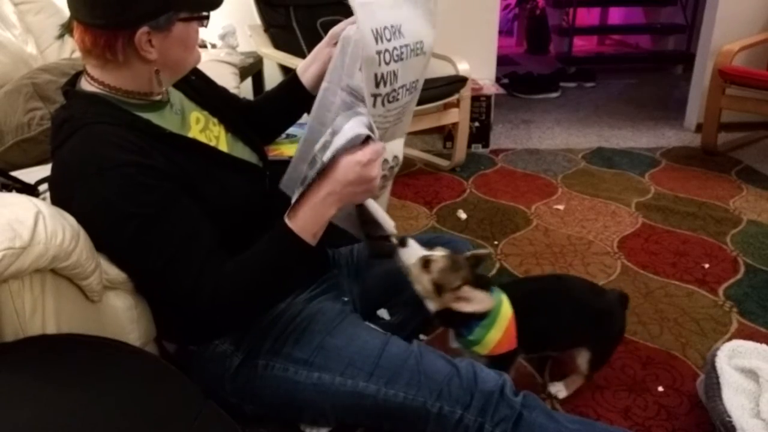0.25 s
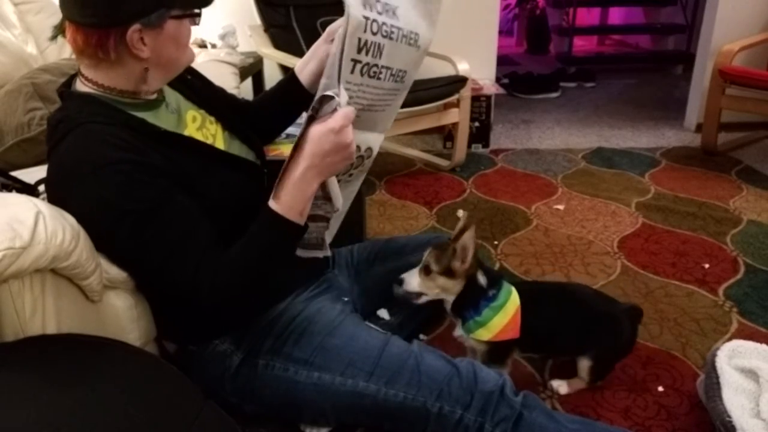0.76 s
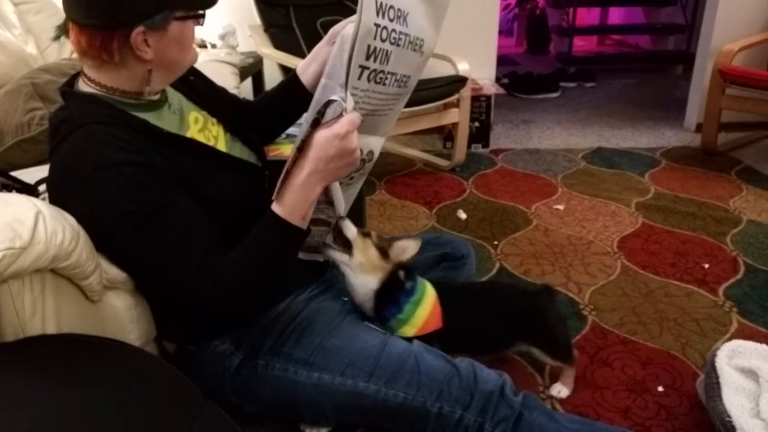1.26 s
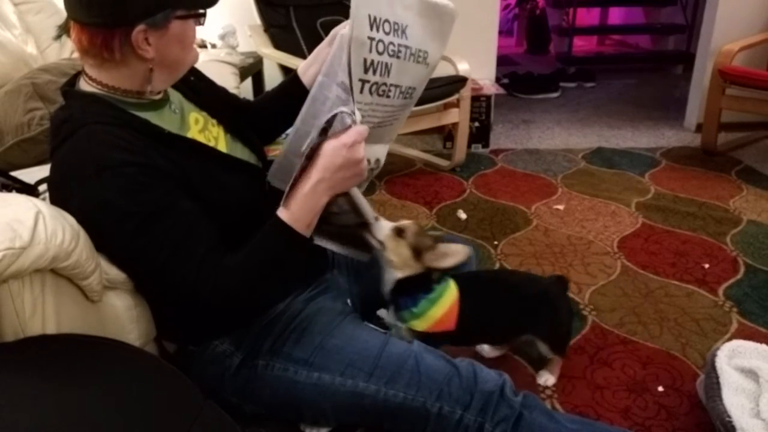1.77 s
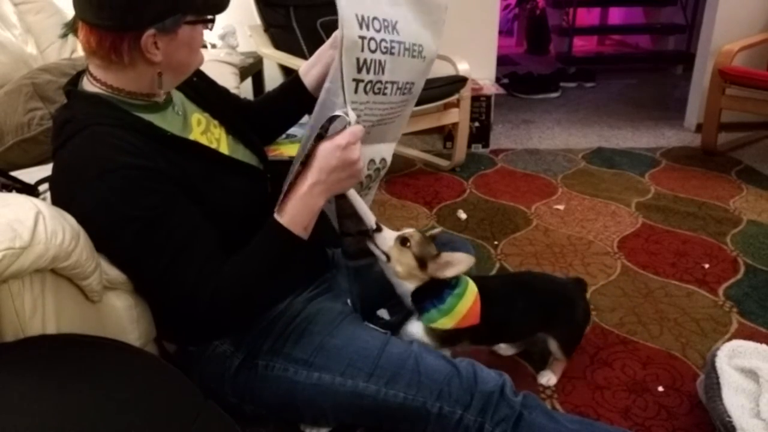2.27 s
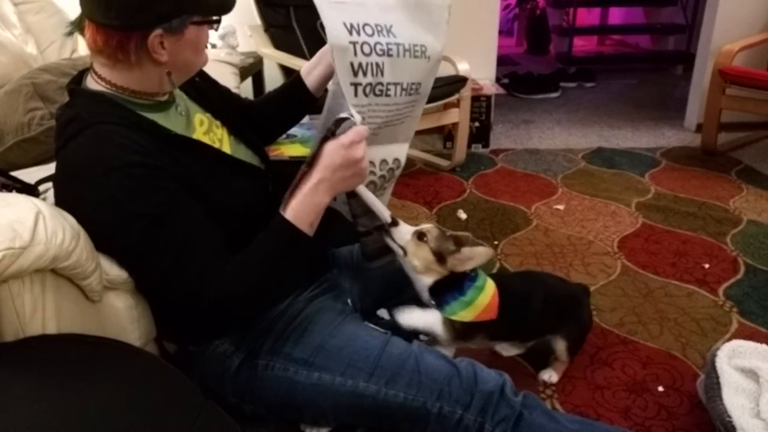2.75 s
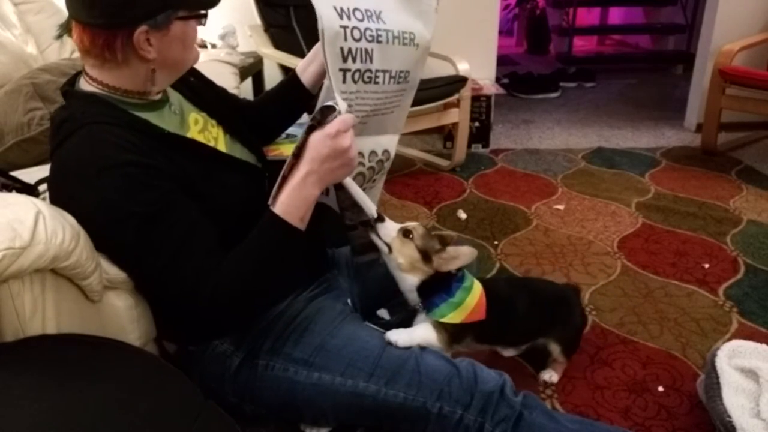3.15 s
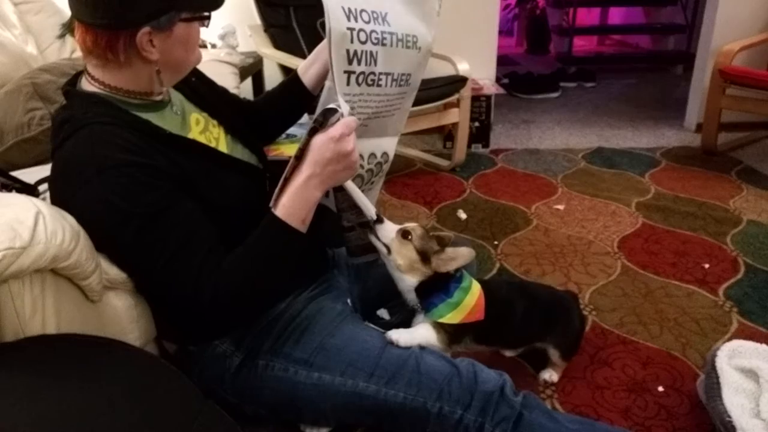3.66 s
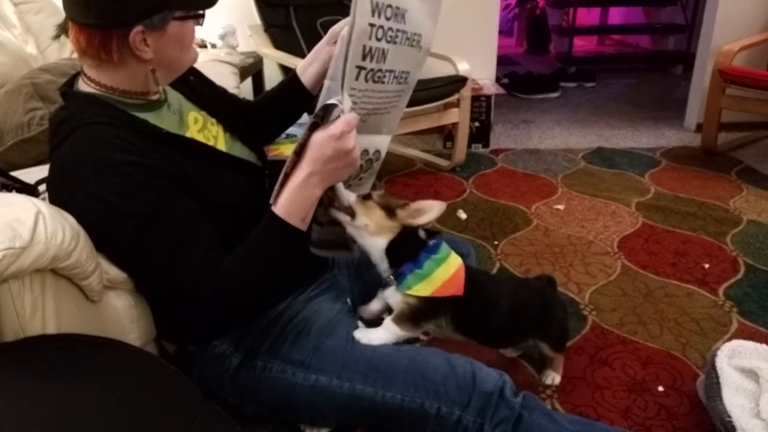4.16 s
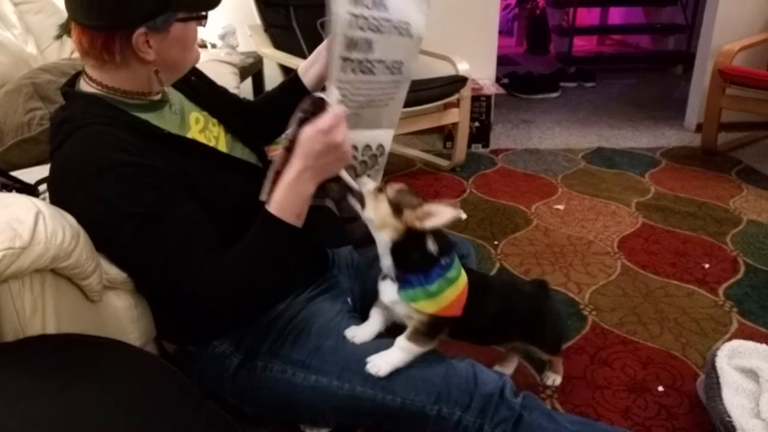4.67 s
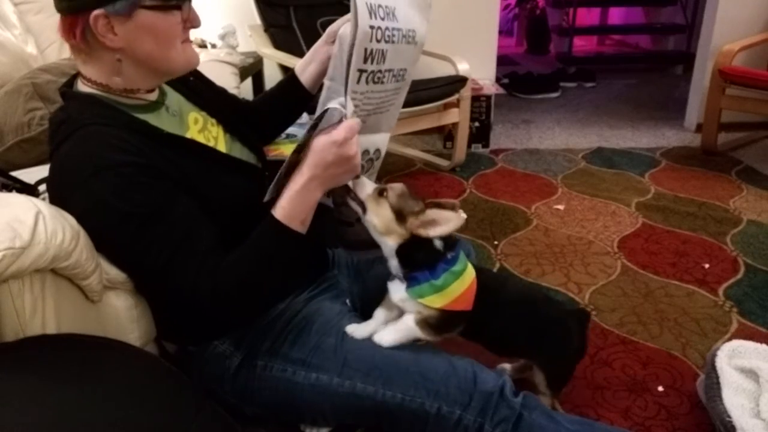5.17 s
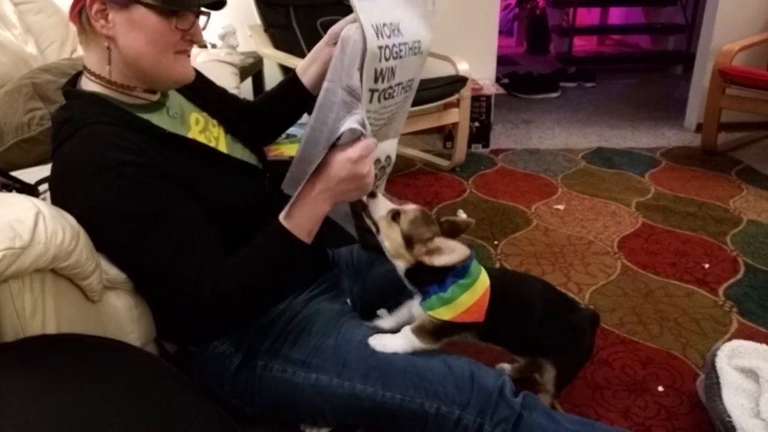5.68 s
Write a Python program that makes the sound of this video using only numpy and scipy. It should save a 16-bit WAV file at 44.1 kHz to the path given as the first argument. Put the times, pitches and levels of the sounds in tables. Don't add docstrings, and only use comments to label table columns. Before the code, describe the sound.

In a carpeted living room, a puppy bites and tugs a newspaper close to a single microphone. From 0 to 0.5 s there are light nibbling crackles and a few thin, very high tinkles from its collar tag. At about 0.6 s a hard yank gives the loudest, brightest burst of tearing, fading by 0.9 s into faint rustle. Pulls build from 1.6 s, with crease cracks and a dense crumple around 1.9 to 2.2 s, then a tiny tinkle at 2.3 s and small pops. Lighter crackles come at 2.7 to 2.9 s. From 3 to 4.1 s it is nearly still, with only sparse ticks over soft hiss, faint motor hum and low rumble. From 4.2 s jerks return: sharp snaps at 4.3, 4.4 and 4.6, a strong crack with a gust of air at 5.2, then hollow pops and continuing rustle until 6 s. The room reflection is short and dry.

```python
import sys
import numpy as np
from scipy import signal
from scipy.fft import rfft, irfft, next_fast_len
from scipy.io import wavfile
from scipy.ndimage import uniform_filter1d, map_coordinates

SR = 44100
rng = np.random.default_rng(int(sys.argv[2]) if len(sys.argv) > 2 else 0)


def materialize(psi):
    bounded = np.clip(np.atleast_2d(psi).T, -1, 1)
    quanta = np.round(bounded * 32767).astype(np.int16)
    wavfile.write(sys.argv[1], SR, quanta)


def volts(x):
    e = np.asarray(x, float) / 20
    return 10 ** e


N = 261072

# pitch_hz, level_db (per Hz)
HISS_COLOUR = [(240, -40), (400, -7), (481, -6.5), (775, -6.5), (1980, -10.5), (2070, -11.5), (2210, -10.5),
               (4550, -11), (15800, -11)]
# pitch_hz, level_db (per Hz)
RUMBLE_COLOUR = [(35, -35), (60, -1.5), (146, -3.5), (237, -10.5), (286, -6), (376, -14.5), (500, -14),
                 (650, -77), (1100, -120)]
# pitch_hz, level_db (rms)
FAN_HUM = [
    (72.7, -76.5),
    (145.3, -78),
]
# peak_s, level_db
AIR_PUSHES = [
    (.1, -58.5),
    (.66, -51),
    (1.57, -52),
    (1.96, -65),
    (2.23, -58),
    (2.92, -53),
    (4.19, -59),
    (4.78, -58),
    (4.96, -63),
    (5.18, -48),
]
# pitch_hz, level_db (per Hz)
FLEX_COLOUR = [(41, -37), (70, -4.5), (156, -11.5), (516, -5.5), (613, -2), (729, -5.5), (1010, -3),
               (3000, -7.5), (3900, -24), (6600, -120)]
# pitch_hz, level_db (per Hz)
RIP_COLOUR = [(880, 9), (1500, 10.5), (1660, 6.5), (2340, 0), (4260, -5), (5140, -5), (6510, -5),
              (10800, -5.5), (15800, -9)]
# time_s, crumple_db
STRAIN = [(0, -67.5), (.9, -66), (1.3, -72), (1.55, -69.5), (2.3, -66), (2.6, -72.5), (3.07, -71),
          (3.43, -82), (3.95, -87), (4.15, -65.5), (4.95, -67), (5.4, -67), (5.92, -64.5)]
# flap_db, flex_db, crumple_db, rip_db
STRAIN_LAYERS_DB = [-2.5, -0.3, -1.2, -3.5]
# start_s, held_s, crumple_db, folds_over_db, fibres_over_db
YANKS = [(.572, 0.0058, -39.5, 0, -2.5), (.588, 0.06, -39.5, -4, 3), (4.285, 0.006, -50, -8, -6),
         (4.4105, 0.0049, -48.5, 3.5, 0), (4.566, 0.011, -54.5, 4, -4), (4.764, 0.03, -62.5, 6.5, -19),
         (5.091, 0.0074, -51, 1.5, -8), (5.189, 0.0076, -49.5, 4, -1), (5.315, 0.0094, -61, 8, -8),
         (5.505, .012, -64.5, 1, -6), (5.582, 0.014, -57.5, 6.5, 2), (5.906, .01, -60, 6, -2)]
# top_s, held_s, crumple_db, folds_over_db, fibres_over_db
PULLS = [(.68, 0.046, -41.5, -10, 3.5), (.715, 0.012, -46.5, -5.5, 2), (.74, 0.0033, -49, 2, -6),
         (1.625, 0.0092, -62, 8.5, -3), (1.655, 0.009, -54.5, -8, -22), (1.74, 0.019, -57.5, -1.5, -6.5),
         (1.82, 0.029, -53, -2, -6.5), (1.9, .01, -66, -6, 1), (1.94, 0.023, -43, 2, 0),
         (2.005, 0.035, -44, 1.5, -2.5), (2.095, 0.015, -48.5, -4, 0), (2.13, 0.0089, -45, 0.5, -23),
         (2.2, 0.033, -61, 7.5, 0), (2.73, 0.027, -58, 0, -3.5), (2.785, 0.0089, -57, -3.5, -2),
         (2.925, 0.0093, -60, 3, 3.5), (4.34, 0.0065, -65.5, 10.5, 0), (4.46, 0.017, -53, -8, -7),
         (4.63, 0.026, -61, 7, -6), (5.068, 0.008, -59, 4.5, -3), (5.63, 0.0079, -52, 0.5, -6)]
# top_s, held_s, crumple_db, folds_over_db, fibres_over_db
NIBBLES = [(.07, 0.0066, -63, 3, -5), (.14, 0.091, -69, 2.5, 0), (.33, 0.024, -62.5, -22, -1),
           (.385, 0.028, -59, -2.5, -2.5), (.45, .03, -61, -2.5, -7), (.505, 0.059, -66.5, 4, 1),
           (.965, 0.028, -64.5, -2, -1), (1.17, 0.031, -69.5, -28, 1), (2.47, 0.051, -66.5, 2, -18),
           (2.63, .015, -68.5, -7, 2.5), (2.675, 0.017, -61.5, -23, -4), (2.86, .015, -62, -12, -8),
           (2.99, 0.011, -69, 3, -11), (3.24, .008, -68, -3, -8), (3.5, 0.015, -73, 7, -17),
           (3.64, 0.014, -71, -8, -4), (4.19, 0.1, -67, -1, -2.5), (4.72, 0.0075, -64, -7, 1.5),
           (4.86, 0.024, -68.5, 5, -1), (5.44, 0.029, -71.5, 11.5, 10.5), (5.725, 0.0098, -63, 1, -12),
           (5.79, 0.023, -69, 5, -17)]
SAG = [15, 11.7, 12, 44]
FALL = [153, 185, 174, 229]
# top_s, flap_db
SWINGS = [(.6, -51), (1.74, -60.5), (2.115, -53.5), (2.39, -63), (2.725, -60), (4.28, -63), (4.415, -50.5),
          (4.56, -54.5), (4.86, -59.5), (5.105, -57), (5.63, -60)]
# start_s, peak_db, lower_modes_db
TAG_STRIKES = [(0.0094, -62, -8), (0.1191, -52, -10), (0.1351, -42, -20), (0.3554, -55, -14),
               (0.3631, -48, -12), (0.3844, -52, -9), (0.783, -65, 0), (0.8, -60, 4), (2.2864, -61, -32),
               (2.2942, -52, -32), (2.3017, -50, -28)]
# pitch_hz, level_db, t60_s
TAG_MODES = [
    (14900, -2, 0.092),
    (8400, 2, .03),
    (10400, -5, .08),
]
# start_s, peak_db, sheet_hz, crease_hz
FOLDS = [(0.064, -44, 2430, 3740), (0.576, -30, 2520, 10500), (1.631, -42, 560, 3740),
         (2.119, -35, 2300, 3500), (2.136, -36, 1930, 3000), (3.492, -47.5, 1070, 3500),
         (4.235, -47, 875, 3960), (4.334, -37, 1230, 4950), (4.407, -28.5, 1310, 9900),
         (4.563, -32.5, 1370, 6400), (5.0935, -34, 900, 3600), (5.189, -26.5, 1020, 4560),
         (5.507, -41, 1990, 4500), (5.098, -36, 1200, 2500), (1.748, -49, 700, 1500),
         (5.638, -37, 1110, 3900), (5.808, -44.5, 1280, 10700)]
# start_s, peak_db, sheet_hz, crease_hz
CREASES = [(0.307, -51, 530, 14000), (0.325, -53, 890, 13500), (0.5, -48, 657, 12800),
           (0.509, -46, 490, 3720), (0.515, -43.5, 611, 9790), (1.645, -33, 964, 4200),
           (1.858, -40, 614, 12000), (2.037, -27, 1990, 3000), (1.808, -52, 900, 6500),
           (1.824, -46, 900, 9000), (1.865, -43, 900, 9500), (2.622, -52, 900, 11000),
           (2.887, -52, 900, 10000), (4.573, -42, 900, 6500), (4.576, -39, 900, 8500),
           (4.585, -48, 900, 8000), (4.614, -47, 900, 11500), (4.413, -44, 900, 11000),
           (4.422, -38, 900, 10500), (4.458, -48, 900, 11500), (5.1995, -41, 900, 4200),
           (5.2036, -28, 900, 3520), (5.211, -32, 900, 5000), (5.33, -44, 900, 8500),
           (5.378, -50, 900, 12000), (4.5632, -39, 900, 10000), (3.24, -50, 1670, 4000),
           (3.637, -50, 845, 4600), (4.289, -35, 2430, 7550), (5.2071, -24, 970, 4740),
           (5.525, -54, 2150, 4300), (5.585, -41, 2500, 4800), (4.407, -35, 2000, 13500),
           (5.189, -29, 2000, 6000), (5.1883, -38, 1500, 12500), (4.289, -38, 2000, 2700)]
# start_s, peak_db, sheet_hz, crease_hz
KNOCKS = [(1.66, -47, 1380, 4140), (2.719, -49, 390, 2000), (4.351, -35, 2280, 3860),
          (4.761, -45, 1960, 3670), (4.4073, -30, 585, 3000), (4.4077, -33, 1430, 3000),
          (4.613, -40, 1340, 4500), (5.622, -35.5, 1030, 2000), (1.944, -34, 770, 2000),
          (1.96, -36, 1480, 4000), (4.337, -47, 1510, 3000), (5.332, -36, 614, 2400),
          (5.315, -29.5, 1040, 7900), (5.589, -33.5, 1250, 4950), (5.782, -43, 1690, 4060),
          (5.913, -46, 1290, 5290)]
# top_s, held_s, level_db, pitch_hz
SCRUNCHES = [(.075, 0.013, -66, 3400), (.35, .05, -62, 6000), (1.03, .025, -67, 14000),
             (1.656, 0.008, -55, 4500), (2.038, .008, -46, 2600), (2.133, 0.0087, -50, 2480),
             (.625, 0.016, -45, 2600), (.69, .02, -48, 10000), (1.95, .015, -50, 1900),
             (2.0, .02, -52, 1090), (2.022, .006, -50, 5000), (2.119, .006, -55, 3000),
             (2.69, .006, -63, 2500), (2.715, 0.027, -65, 2580), (2.79, .008, -63, 12000),
             (2.91, 0.037, -62.5, 3300), (5.33, .015, -60, 8500), (5.43, .03, -60.5, 13500),
             (5.113, .008, -62, 4000), (4.595, .015, -62, 6200), (1.83, .02, -60, 7000),
             (5.194, .03, -52, 3500), (5.2, .015, -52, 6300), (.7, .04, -47, 6000), (1.925, .025, -50, 600),
             (2.48, .02, -69, 3100), (4.302, 0.0055, -50.5, 4160), (4.305, 0.014, -52, 7350),
             (4.422, 0.006, -55, 2000), (4.572, 0.012, -53.5, 6440), (4.622, 0.022, -55, 2160),
             (5.1, 0.019, -59, 2520), (5.198, 0.011, -49.5, 4370), (5.51, 0.016, -59.5, 3000),
             (5.59, 0.03, -57, 5300), (5.785, 0.024, -59.5, 1870), (5.9, .01, -66, 6500)]
# peak_s, low_hz, high_hz, level_db
HISS_PATCHES = [
    (0.635, 6240, 7570, -49),
    (0.706, 10900, 12450, -49),
    (3.05, 13800, 15300, -80),
    (3.37, 5200, 6300, -80),
    (3.7, 6300, 7700, -78),
    (3.7, 9600, 15300, -75),
    (4.0, 11000, 14500, -75),
    (4.0, 4700, 5800, -82),
    (4.17, 4280, 5800, -76),
    (4.17, 13000, 14500, -80),
]
# start_s, level_db, pitch_hz, t60_s
POPS = [(2.428, -52, 830, .035), (2.452, -59, 750, .04), (2.471, -56, 2930, .03), (2.487, -58, 3500, .015),
        (4.424, -40, 2000, .02), (4.613, -45, 1330, .035), (4.63, -49, 2200, .02), (5.589, -38, 1320, .025),
        (2.328, -58, 640, .05), (2.352, -58, 680, .04), (2.773, -56, 1700, .02), (2.934, -54, 1600, .03),
        (1.682, -57, 1380, .05), (5.325, -45, 1000, .06), (5.345, -48, 1050, .06), (5.634, -47, 1100, .03),
        (5.641, -50, 950, .015), (5.664, -55, 900, .015), (5.601, -45, 1300, .05), (5.913, -42, 1240, .05),
        (4.415, -44, 420, .07), (5.192, -46, 600, .06), (5.319, -44, 610, .08), (5.32, -49, 1700, .05),
        (5.0945, -45, 550, .03), (.74, -46, 1320, .06)]
# pitch_hz, t60_s
ROOM_DECAY = [(200, 0.14), (1500, 0.17), (6000, 0.18), (14000, 0.16)]


def unit(x):
    return x / np.sqrt(np.mean(x ** 2) + 1e-20)


def along(points, hz):
    f, v = np.transpose(points)
    return np.interp(np.log(hz + 1), np.log(f + 1), v)


def wobble(rate):
    knots = rng.standard_normal(int(N * rate / SR) + 4)
    return map_coordinates(knots, [np.arange(N) * rate / SR])


def filtered(x, response):
    m = next_fast_len(N + SR // 2)
    return irfft(rfft(x, m) * response(np.fft.rfftfreq(m, 1 / SR)), m)[..., :N]


def swell(t, held, rise, sag, fall):
    return rise * np.minimum(t, 0) - sag * np.clip(t, 0, held) - fall * np.maximum(t - held, 0)


def around(s):
    near = slice(max(round((s - .25) * SR), 0), min(round((s + .5) * SR), N))
    return near, np.arange(near.start, near.stop) / SR - s


def shaped_noise(colour):
    return unit(filtered(rng.standard_normal(N), lambda f: volts(along(colour, f))))


def fan(t):
    turns = t + 0.00064 * wobble(3.78)
    hum = np.zeros(N)
    for hz, db in FAN_HUM:
        hum += volts(db + 5.5 + 1.8 * wobble(3.89)) * np.sin(2 * np.pi * hz * turns)
    return hum


def moving_air(t):
    air = unit(filtered(rng.standard_normal(N), lambda f: (f > 8) / (1 + (f / 24) ** 2.18)))
    power = np.full(N, volts(2 * -62))
    for s, db in AIR_PUSHES:
        power += volts(2 * (db + swell(t - s, 0.0063, rise=110, sag=0, fall=96)))
    return np.sqrt(power) * air


def background():
    t = np.arange(N) / SR
    hiss = volts(-65.3 + 0.23 * wobble(2.8)) * shaped_noise(HISS_COLOUR)
    rumble = volts(-69.5 + 1.5 * wobble(7)) * shaped_noise(RUMBLE_COLOUR)
    return hiss + rumble + fan(t) + moving_air(t)


def motion():
    flap_db = -10
    sag, fall = np.array(SAG)[:, None], np.array(FALL)[:, None]
    strain_s, strain_db = np.transpose(STRAIN)
    taut_db = np.interp(np.arange(N) / SR, strain_s, strain_db)
    power = volts(2 * (taut_db + np.array(STRAIN_LAYERS_DB)[:, None]))
    kinds = [(YANKS, 220, 0.99, 0.0052, 4900),
             (PULLS, 214, 1, 0, 0),
             (NIBBLES, 250, 3.1, 0, 0)]
    for tugs, rise, pace, lag, cut in kinds:
        for s, held, db, folds_db, fibres_db in tugs:
            near, t = around(s)
            layers_db = db + np.array([[folds_db + flap_db], [folds_db], [0], [fibres_db]])
            tug_db = swell(t - lag, held, rise, sag, pace * fall) + cut * np.minimum(t, 0)
            power[:, near] += volts(2 * (layers_db + tug_db))
    for s, db in SWINGS:
        near, t = around(s)
        power[0, near] += volts(2 * (db + swell(t, 0, rise=640, sag=0, fall=FALL[0])))
    return 10 * np.log10(power)


def crackle(colour, lo_hz, hi_hz, per_second, spread_db, clump_db, diffuse):
    breaks = rng.random(N) < per_second / SR
    sizes = volts(spread_db * np.minimum(rng.exponential(1, N), 3.2)) * rng.standard_normal(N)
    grains = unit(breaks * sizes) + diffuse * rng.standard_normal(N)
    grains = volts(clump_db * wobble(45)) * grains

    def response(f):
        low_cut = (f / lo_hz) ** 4 / (1 + (f / lo_hz) ** 4)
        return volts(along(colour, f)) * low_cut / (1 + (f / hi_hz) ** 4)
    return unit(filtered(grains, response))


def patchy(x, depth_db):
    z = signal.stft(x, nperseg=512)[2]
    field = uniform_filter1d(rng.standard_normal(z.shape), size=5, axis=0)
    field = uniform_filter1d(field, size=6, axis=1)
    gain = volts(depth_db * unit(field) - depth_db ** 2 / 9)
    return signal.istft(z * gain, nperseg=512)[1][:N]


def rustle():
    flap_db, flex_db, crumple_db, rip_db = motion()
    flap = volts(flap_db - 2.0) * crackle(
        FLEX_COLOUR, 59, 555, per_second=250, spread_db=4.5, clump_db=-1.0, diffuse=1.05)
    flex = volts(flex_db - 3.5) * crackle(
        FLEX_COLOUR, 280, 2500, per_second=1400, spread_db=2.0, clump_db=0.1, diffuse=1.27)
    crumple = volts(crumple_db - 2.0) * crackle(
        RIP_COLOUR, 2420, 5340, per_second=3000, spread_db=-1.5, clump_db=2.0, diffuse=1.6)
    rip = volts(rip_db + 1.0) * crackle(
        RIP_COLOUR, 4660, 18400, per_second=12000, spread_db=3.0, clump_db=0.0, diffuse=2.4)
    sheet = patchy(flap + flex + crumple + rip, depth_db=1.0)
    return np.pad(sheet, (170, 0))[:N]


def tag():
    out, t = np.zeros(N + SR), np.arange(SR // 4) / SR
    for s, db, lower_db in TAG_STRIKES:
        for hz, mode_db, t60 in TAG_MODES:
            level_db = db + mode_db + (lower_db if hz < 12000 else 0)
            ring = np.sin(2 * np.pi * (hz * t + rng.random()))
            out[round(s * SR):][:len(t)] += volts(level_db - 60 * t / t60) * ring
    return out[:N]


def snaps():
    out, t = np.zeros(N + SR), np.arange(SR // 50) / SR
    kinds = [(FOLDS, -7.5, -11), (CREASES, -21, -8.5), (KNOCKS, -6.5, -16)]
    for events, thump_db, crack_db in kinds:
        for s, db, sheet_hz, crease_hz in events:
            noise = rng.standard_normal((2, len(t)))
            peak = signal.iirpeak(min(crease_hz, 18000), 1.3, SR)
            crease = signal.lfilter(*peak, signal.lfilter(*peak, noise[0]))
            crack = volts(crack_db + 9.0 - 60 * t / 0.011) * (crease + 0.07 * noise[0])
            crack *= 1 - np.exp(-t / 0.00019)
            body = volts(thump_db + 2.0 - 60 * t / 0.048) * uniform_filter1d(noise[1], size=11)
            ring = np.sin(2 * np.pi * sheet_hz * t) + .5 * np.sin(2 * np.pi * 1.81 * sheet_hz * t)
            sudden = 1 - np.exp(-t / 0.0003)
            thump = volts(thump_db + 7.5 - 60 * t * sheet_hz / 7) * ring * sudden
            out[round((s + .0008) * SR):][:len(t)] += volts(db) * (crack + body + thump)
    return out[:N]


def scrunches():
    out = np.zeros(N)
    cracks = crackle([(1000, 0)], 500, 16000, per_second=2500, spread_db=2.5, clump_db=.8, diffuse=.9)
    for s, held, db, hz in SCRUNCHES:
        near, t = around(s)
        peak = signal.iirpeak(hz, 1.74, SR)
        tuned = unit(signal.lfilter(*peak, signal.lfilter(*peak, cracks[near])))
        out[near] += volts(db + swell(t, held, rise=1350, sag=0, fall=550)) * tuned
    return out


def hiss_patches():
    t, side = np.arange(N) / SR, np.zeros(N)
    for s, lo_hz, hi_hz, db in HISS_PATCHES:
        noise = unit(filtered(rng.standard_normal(N), lambda f: (f > lo_hz) & (f < hi_hz)))
        side += volts(db) * noise * np.cos(np.pi * np.clip((t - s) / 0.035, -.5, .5))
    return np.array([side, -side])


def pops():
    out, t = np.zeros(N + SR), np.arange(SR // 10) / SR
    for s, db, hz, t60 in POPS:
        waver = 0.039 * np.cumsum(rng.standard_normal(len(t)))
        ring = np.sin(2 * np.pi * hz * t + waver)
        out[round(s * SR):][:len(t)] += volts(db - 60 * t / t60) * (1 - np.exp(-t / 0.00051)) * ring
    return out[:N]


def room(x):
    out, hop = np.zeros(N + SR), SR // 4
    for start in range(0, N, hop):
        hz, t, z = signal.stft(rng.standard_normal(SR // 2), SR, nperseg=256)
        decay = volts(-60 * t / along(ROOM_DECAY, hz)[:, None])
        tail = signal.istft(z * decay, SR, nperseg=256)[1]
        tail = tail * (1 - np.exp(-np.arange(len(tail)) / SR / 0.0014))
        delayed = np.pad(tail / np.linalg.norm(tail), (220, 0))
        wet = signal.fftconvolve(x[start:start + hop], delayed)
        out[start:][:len(wet)] += wet
    return out[:N]


def scene():
    floor = background()
    sheet = rustle() + scrunches()
    jingle, creases, pockets = tag(), snaps(), pops()
    walls = room(volts(-3.5) * creases + volts(-3.5) * pockets + volts(-8) * jingle + volts(-13) * sheet)
    mono = creases + pockets + jingle + volts(-0.98) * sheet + walls + floor
    return np.array([mono, mono])


def top_cut(x):
    return signal.sosfilt(signal.butter(12, 16540, fs=SR, output="sos"), x)


def record(dry):
    mix = filtered(dry, lambda hz: hz < 15830) + hiss_patches()
    return top_cut(mix)


dry = scene()
out = record(dry)
materialize(out)
```